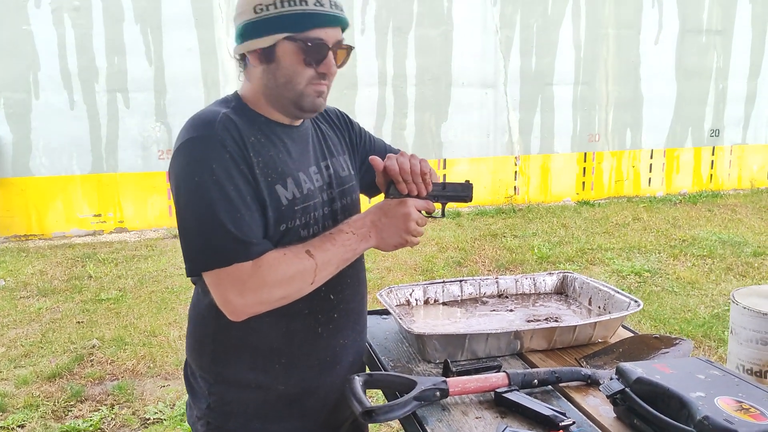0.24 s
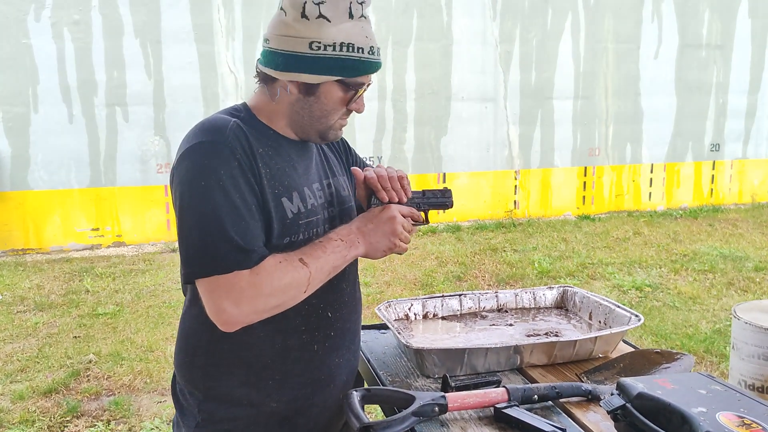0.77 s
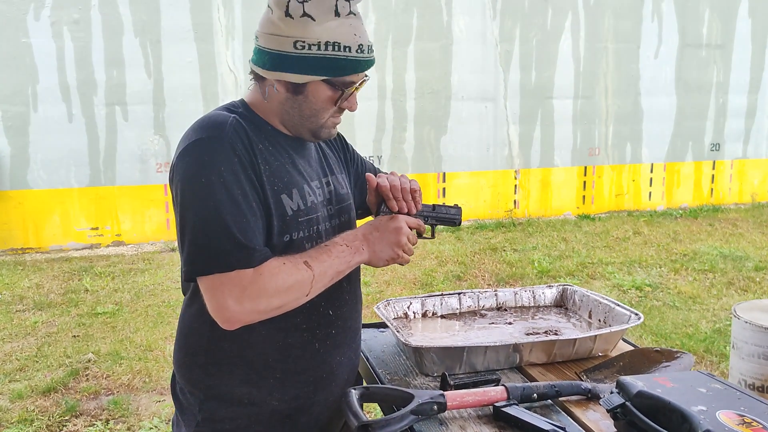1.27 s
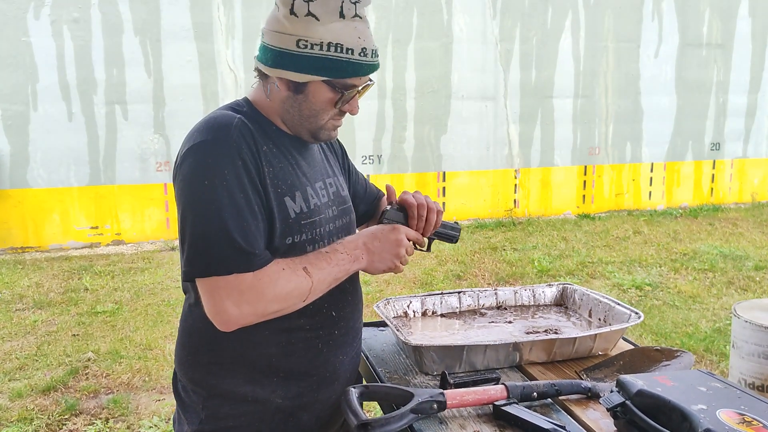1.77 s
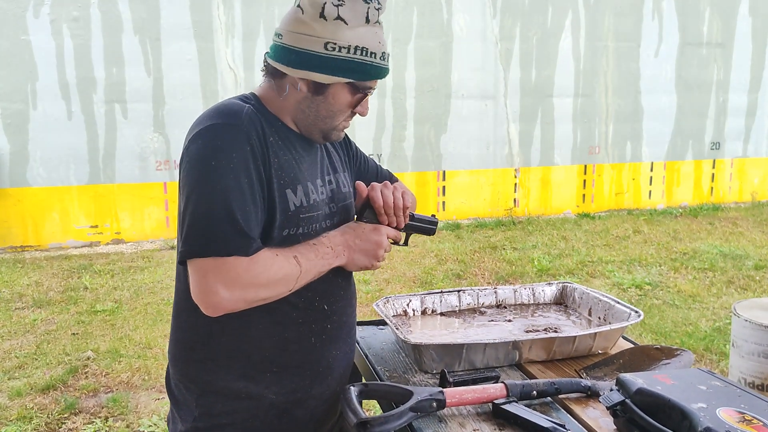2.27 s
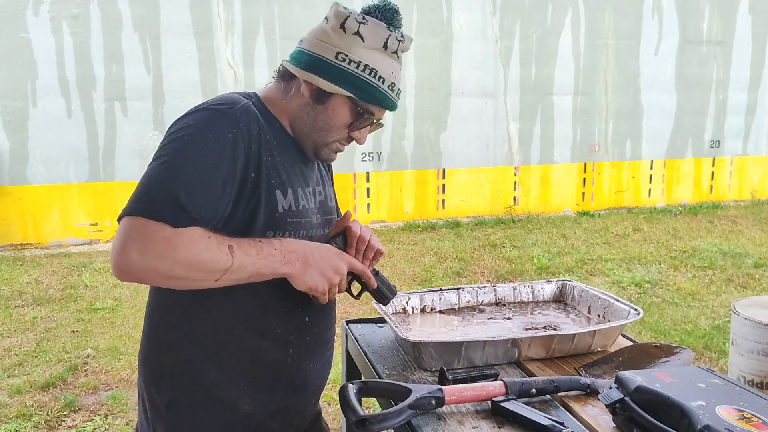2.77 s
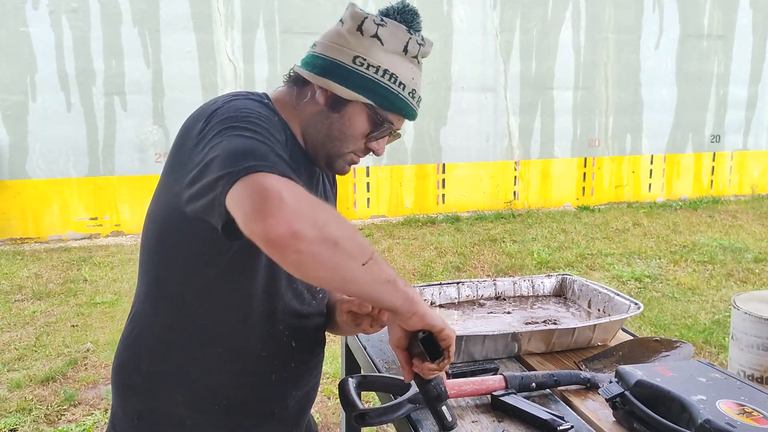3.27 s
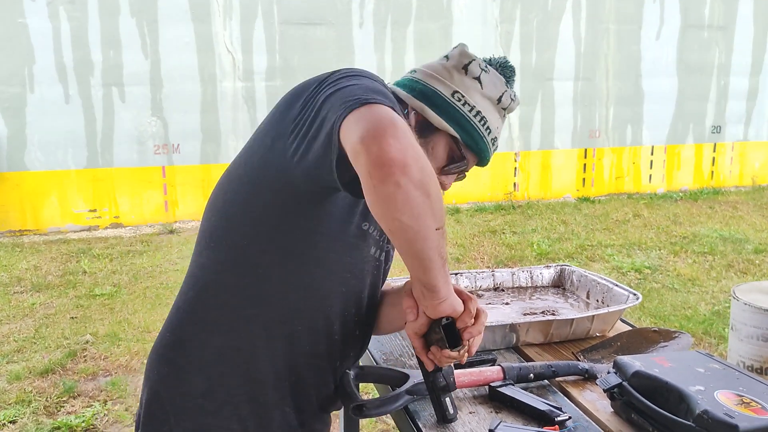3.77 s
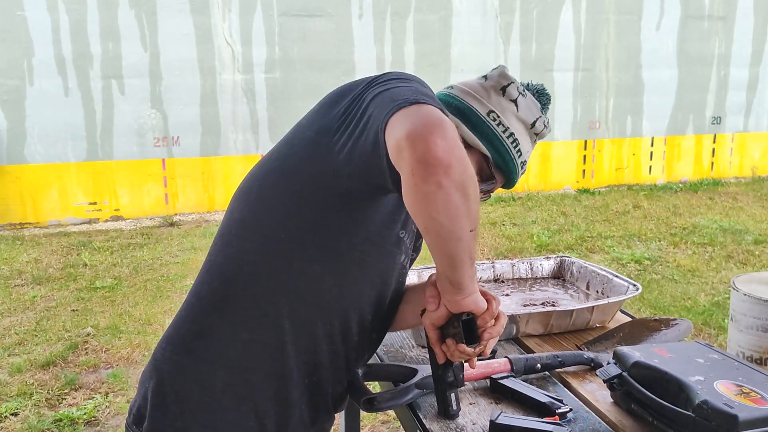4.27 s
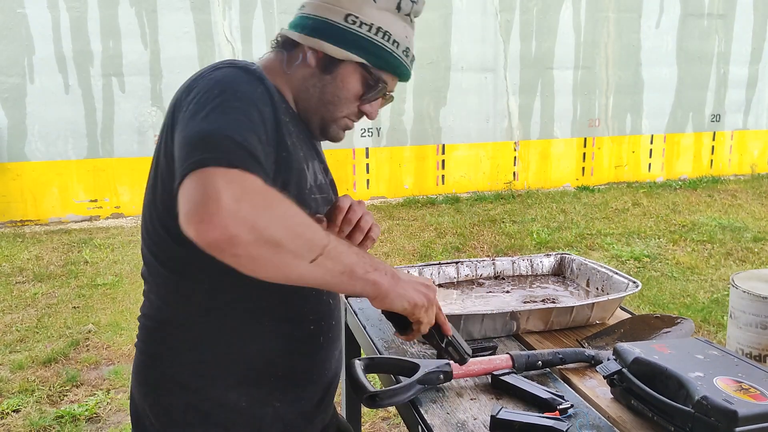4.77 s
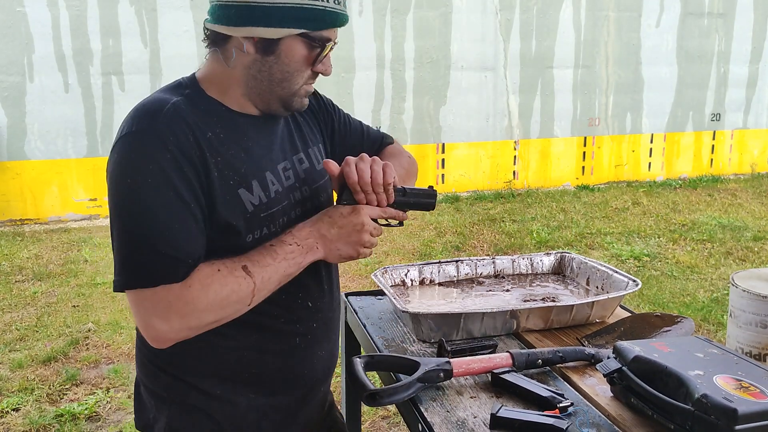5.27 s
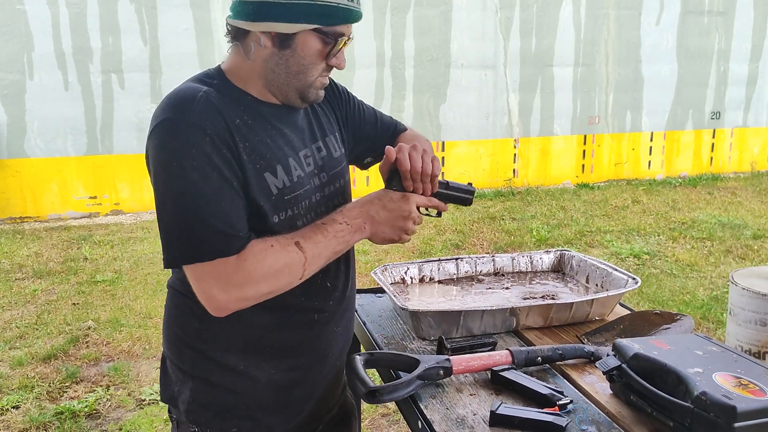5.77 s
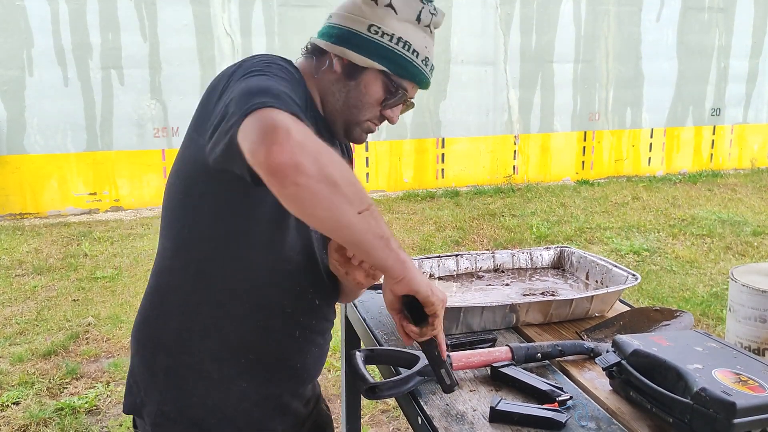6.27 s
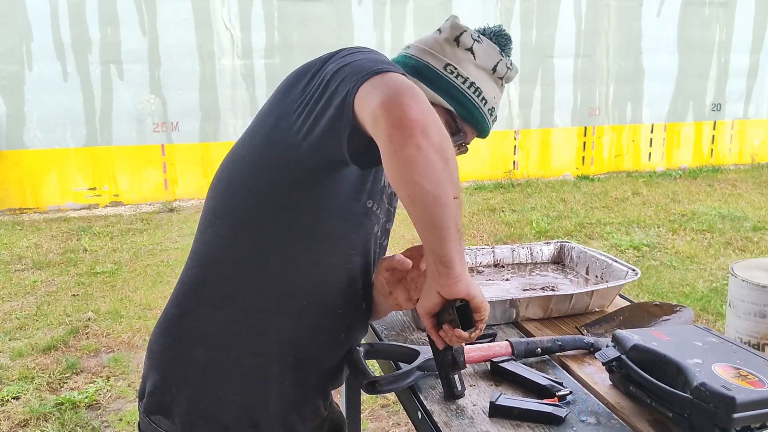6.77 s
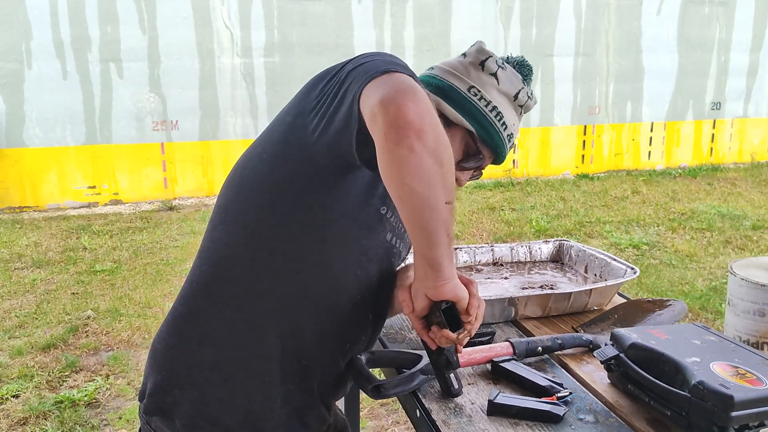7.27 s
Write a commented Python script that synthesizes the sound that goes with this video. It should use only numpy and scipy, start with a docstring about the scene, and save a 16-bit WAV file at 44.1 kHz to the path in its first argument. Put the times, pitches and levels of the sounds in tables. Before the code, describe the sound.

Close stereo sound of steel handling at an open range with distant reflecting walls. Two very loud metal slams come early, among catches and ticks. After a quieter gap, soft wooden knocks lead to a heavy shove with board resonance and rattle. A clack and scrape mark the lift, then light handling, another knock, and a final short, hard shove. Thin high chirps, low wind puffs and a dying wash lie behind.

```python
"""A jammed pistol slide is forced by hand at an outdoor range, in light wind and a fading distant wash.
Held up, it slams twice: noise cracks with ringing steel modes; a bird chirps in short runs of arched tones.
The muzzle is then set on a wooden table and shoved down: filtered thuds, board modes and a rattling tail.
It is lifted, set down again and shoved once more at the end, with far less boom. Clicks, scrapes of tiny
slips and faint handling ticks run between; the wind is low noise with early puffs on the microphone."""
import sys
import numpy as np
from scipy import signal
from scipy.fft import rfft, irfft, next_fast_len
from scipy.io import wavfile
from scipy.ndimage import uniform_filter1d

SR = 44100
rng = np.random.default_rng(int(sys.argv[2]) if len(sys.argv) > 2 else 0)


def unload_wav(signal):
    """Save mono or channel-first audio to the path in sys.argv[1] as 16-bit WAV at rate SR, clipped to [-1, 1]."""
    wavfile.write(
        sys.argv[1],
        SR,
        np.round(np.clip(np.atleast_2d(signal).T, -1, 1) * 32767).astype(np.int16),
    )


N = 332293

# body weight drives the slide against the table:
# start_s, level_db, boards_boom_db, hardness_db_per_octave, left_minus_right_db
SHOVES = [(4.0898, -16.5, 0.5, 0.8, -4), (7.49, -16.5, -14, 1.5, 2.5)]
# ring of slide and barrel: mode_hz, level_db, t60_s
STEEL_MODES = [(970.4, 1.5, 0.1), (1390, -6, 0.074), (1523, -5, 0.14), (1963, -6.5, 0.12), (2535, 0, 0.09),
               (2862, 3.5, 0.05), (3010, 3, 0.081), (3437, 0.5, 0.08), (3660, -4.5, 0.09),
               (4410, -3.5, 0.12), (4700, -3.5, 0.08), (5740, -2, 0.13), (6230, -2, 0.031),
               (7300, -5, 0.16), (10260, -9, 0.073), (11300, -10, 0.12), (11900, -7.5, 0.056)]
# spectrum of a steel contact: freq_hz, density_db_per_hz
CRACK_SPECTRUM = [(100, -39), (500, -26.5), (780, -12), (960, -6.5), (1150, -10), (1500, -6.5), (2000, -3),
                  (2900, -2.5), (4000, -2.5), (5600, -2.5), (8000, -8), (10000, -11.5), (12500, -6),
                  (16000, -13)]
LEFT_LEAD_SAMPLES = 21  # the held-up gun is nearer the left port


def slams():
    """The barrel is picked up with a short tick, then the slide stops against the frame."""
    # start_s, level_db, tilt_db_per_octave, first_touch_lead_s, first_touch_relative_db
    slam_rows = [(0.586, -8, 0.63, .0038, -8), (1.4912, -6.5, 1.5, 0.004, -7)]
    out = np.zeros((2, N))
    for start_s, level_db, tilt_db_oct, lead_s, touch_db in slam_rows:
        touch = contact(1, tilt_db_oct - .5, crack_s=.002, near_db=-16.0, near_t60_s=.05,
                        far_db=-34.0, steel_db=-10.5)
        left_right_db = np.array([[6], [-1]])
        add(out, start_s - lead_s, amp(level_db + touch_db + left_right_db) * touch)
        stop = contact(0.93, tilt_db_oct, crack_s=0.003, near_db=-15.5, near_t60_s=0.15,
                       far_db=-27.0, steel_db=-8.5)
        stop = amp(level_db + 4) * stop
        add(out, start_s, stop)
        add(out, start_s + 0.012, amp(-14.5) * stop[::-1])  # echo off the ground, sides swapped
    return out


def clicks():
    """Steel parts catch and let go, and each shove ends with the slide on its stop."""
    # start_s, level_db, brightness_db_per_octave
    click_rows = [(0.3586, -28, -1.9), (0.4654, -25.5, -2), (0.7698, -26.5, 1), (0.7951, -13, -3.5),
                  (0.947, -24, -4.5), (1.1452, -29.5, -4.4), (1.4525, -23, 0), (2.4411, -36, 0),
                  (2.5354, -22, -2), (2.7076, -37, 3.5), (2.8202, -37.5, 15), (3.5578, -35, -3),
                  (3.5893, -26.5, -2.3), (3.646, -32, -0.5), (3.7207, -38.5, -4.5), (4.2367, -21.5, -9.5),
                  (4.464, -35, 2), (4.5448, -34.5, 2), (4.6108, -26.5, 1), (4.762, -24.5, -4.5),
                  (4.7836, -15, -1), (5.3737, -36.5, 4), (5.3996, -29, -5), (5.948, -37, -3.5),
                  (6.0853, -40.5, -7.5), (6.4762, -36, 2.8), (6.5001, -33.5, 0.2), (6.6039, -29.5, -3),
                  (7.222, -39, -1), (7.394, -45.5, -14)]
    pan_pressed_db, pan_held_db = 0.5, 2.5  # left minus right
    stop_delay_s, stop_db, stop_tilt_db_oct = 0.0053, 12, -0.9
    out = np.zeros((2, N))
    for start_s, level_db, tilt_db_oct in click_rows:
        pan_db = by_pose(start_s, pan_pressed_db, pan_held_db)
        add(out, start_s, click(start_s, level_db, tilt_db_oct, pan_db))
    for start_s, level_db, _, _, pan_db in SHOVES:
        stop = click(start_s, level_db + stop_db, stop_tilt_db_oct, pan_db)
        add(out, start_s + stop_delay_s, stop)
    return out


def click(start_s, level_db, tilt_db_oct, pan_db):
    """One steel contact; with the muzzle down, the barrel clanks louder and higher."""
    # barrel pressed on wood, before pitch scaling: mode_hz, level_db, t60_s
    barrel_modes = [(1830, 0, 0.06), (2134, -2, 0.13), (2520, -10.5, 0.059)]
    t = np.arange(SR // 2) / SR
    raised = by_pose(start_s, 0, 0.98)
    tick = contact(raised, tilt_db_oct, crack_s=0.0025, near_db=-16.5, near_t60_s=.13,
                   far_db=-26, steel_db=-10.5)
    tick = amp(2.3 * raised - 6.5) * tick
    pitch = by_pose(start_s, 1.04, 0.92)  # pressure raises the ring
    barrel = [(hz * pitch, mode_db, t60_s) for hz, mode_db, t60_s in barrel_modes]
    clank_db = by_pose(start_s, -14, -19.5) - 0.5 * tilt_db_oct  # dull clicks stir the barrel more
    clank = amp(clank_db) * ring(barrel, t, 0, 2000, spread_rad=0.74, scatter_db=3)
    clank = clank * (1 - np.exp(-t / .001))
    return amp(level_db + pan_db * np.array([[.5], [-.5]])) * (tick + clank)


def contact(raised, tilt_db_oct, crack_s, near_db, near_t60_s, far_db, steel_db):
    """A hard crack, a ring of steel, and scatter from near things and far walls."""
    t = np.arange(SR // 2) / SR
    lead = round(LEFT_LEAD_SAMPLES * raised)  # the table is straight ahead
    crack = colour(pair(len(t), 0.13, lead), CRACK_SPECTRUM, tilt_db_oct) * np.exp(-t / crack_s)
    near = colour(pair(len(t), 0.95, lead), CRACK_SPECTRUM, tilt_db_oct - .7)
    near = near * amp(near_db - 60 * t / near_t60_s)
    far = colour(pair(len(t), 0.069), CRACK_SPECTRUM, tilt_db_oct - 3.0) * amp(far_db - 60 * t / 0.38)
    steel = ring(STEEL_MODES, t, tilt_db_oct, 4000, spread_rad=0.82, scatter_db=3.0)
    steel = amp(steel_db - 11 * (1 - raised)) * steel  # pressure damps it
    return (crack + near + far + steel) * (1 - np.exp(-t / 0.0013))


def knocks():
    """Light touches knock once; a shove heaves the table, which knocks again as it rebounds."""
    # muzzle set down, shifted or lifted: start_s, level_db, boards_boom_db, hardness_db_per_octave
    knock_rows = [(3.37, -38.5, 5, -5), (3.588, -34, -1, -5.5), (4.606, -36, 1.5, -5),
                  (4.775, -28, -1.5, -2.5), (4.843, -55, 9, -12), (6.475, -29, 5, -3.5),
                  (7.392, -44.5, -7, -1)]
    rebound_s, rebound_db, rebound_boom_db = 0.0275, 0, -1.5
    out = np.zeros((2, N))
    for start_s, level_db, boom_db, hard_db_oct in knock_rows:
        add(out, start_s, knock(level_db, boom_db, hard_db_oct, sway_db=-3))
    for start_s, level_db, boom_db, hard_db_oct, _ in SHOVES:
        add(out, start_s, knock(level_db, boom_db, hard_db_oct, sway_db=1.5))
        rebound = knock(level_db + rebound_db, boom_db + rebound_boom_db, hard_db_oct, sway_db=-12)
        add(out, start_s + rebound_s, rebound)
    return out


def knock(level_db, boom_db, hard_db_oct, sway_db):
    """The muzzle drives the table: a short thud, booming boards and one low heave of the frame."""
    # thud: freq_hz, density_db_per_hz
    thud_spectrum = [(25, -24), (55, -11), (110, 1), (180, 0.5), (330, -1), (620, -3.5), (800, -11.5),
                     (980, -11), (1500, -21), (2200, -20.5), (3500, -31.5), (8000, -33.5), (16000, -59)]
    # ring of the table boards: mode_hz, level_db, t60_s
    board_modes = [(122, -5, 0.69), (173.9, 3, 0.43), (202.6, 0.5, 0.28), (287.6, -9.5, 0.41),
                   (333.8, -6.5, 0.35), (406, -21, 0.32), (446, -9.5, 0.057), (584, -24, 0.14),
                   (653, -11.5, 0.29)]
    t = np.arange(SR * 3 // 4) / SR
    rattle_db = -8.5 + 0.14 * (level_db + 24.0)  # a hard blow shakes more of the things on the table
    thud = colour(pair(len(t), 0.92), thud_spectrum, 0.9 * hard_db_oct, 250)
    thud_and_rattle = thud * (amp(-5.0 - 60 * t / 0.12) + amp(rattle_db - 60 * t / 0.5))
    boards = amp(boom_db) * ring(board_modes, t, hard_db_oct, 250, spread_rad=0.32, scatter_db=1.0)
    sway = amp(sway_db - 60 * t / 0.15) * np.sin(2 * np.pi * 63 * t)
    return amp(level_db - 6.0) * (thud_and_rattle + boards + sway) * (1 - np.exp(-t / 0.0036))


def scrapes():
    """Sliding contact: a swarm of tiny slips that swells, lets go, and sets the steel ringing."""
    # steel and skin sliding: peak_s, level_db, swell_s
    scrape_rows = [(.47, -50, 0.023), (.79, -42, 0.058), (1.47, -51, 0.055), (1.67, -43, 0.08),
                   (3.6, -53, 0.054), (4.787, -31, 0.015), (5.33, -59, 0.013), (5.415, -43.5, 0.037),
                   (5.631, -61.5, 0.078), (6.1, -57.5, 0.049), (6.609, -53.5, 0.038), (7.13, -74.5, .17)]
    grind_s, grind_db, grind_swell_s = 0.0078, -10.5, 0.004  # on the way to the stop
    creep_s, creep_db, creep_swell_s = 0.11, -27, 0.043  # the slide creeps on a little
    fade_share = 0.5  # a scrape lets go faster than it swells
    t = np.arange(N) / SR

    grinds = [(s + grind_s, db + grind_db, grind_swell_s) for s, db, *_ in SHOVES]
    creeps = [(s + creep_s, db + creep_db, creep_swell_s) for s, db, *_ in SHOVES]
    peak_s, level_db, swell_s = np.transpose(scrape_rows + grinds + creeps)[:, :, None]
    distance = np.maximum((peak_s - t) / swell_s, (t - peak_s) / (fade_share * swell_s))
    force = amp(level_db) * np.exp(-np.minimum(distance, 20))
    force[-len(SHOVES):] *= t > np.array(SHOVES)[:, :1]  # creeping starts only once the shove has landed

    slip_db = 2.0 * np.minimum(rng.exponential(1, N), 4)
    slips = (rng.random(N) < 600 / SR) * amp(slip_db)  # 600 per second
    slip_envelope = signal.lfilter([1], [1, -np.exp(-1 / (0.0014 * SR))], slips)
    grit = pair(N, .6, LEFT_LEAD_SAMPLES) * unit(0.13 + slip_envelope)

    steel_ring = ring(STEEL_MODES, t[:SR // 8], -1.5, 4000, spread_rad=0.73, scatter_db=2)
    steel = unit(signal.oaconvolve(grit, steel_ring, axes=1)[:, :N])
    rub = colour(grit, CRACK_SPECTRUM, tilt_db_oct=-1.0) + amp(by_pose(t, -20, -8)) * steel
    pressed_chatter = amp(-7.5) * band(grit, 2010, width_hz=640)
    held_chatter = amp(-9) * band(grit, 1610, width_hz=640)
    chatter = by_pose(t, pressed_chatter, held_chatter)  # of the barrel
    shove_force = force[len(scrape_rows):].sum(0)
    squeal = amp(2.5) * shove_force * band(grit, 2230, width_hz=390)  # barrel under load
    return force.sum(0) * (rub + chatter) + squeal


def fidget():
    """The hands shift on the gun all the time: faint scattered ticks."""
    t = np.arange(SR // 30) / SR
    touch_db = 1.2 * np.minimum(rng.exponential(1, N), 3)
    touches = (rng.random(N) < 12 / SR) * amp(touch_db)  # 12 per second
    decay = np.exp(-t / 0.0016) + 0.11 * np.exp(-t / .012)
    force = signal.oaconvolve(touches, decay)[:N]
    return amp(-56.5) * force * colour(pair(N, 0.33, LEFT_LEAD_SAMPLES), CRACK_SPECTRUM, tilt_db_oct=3.0)


def bird():
    """Thin arched notes with a buzzy trill and a dropping end, smeared by echoes from the walls."""
    song, chirps = np.zeros((2, N)), notes()
    variations = rng.uniform(0.93, 1.15, (len(chirps), 3))
    for (start_s, level_db, reference_hz), (stretch, speed, droop) in zip(chirps, variations):
        t = np.arange(round(0.043 * stretch * SR)) / SR
        u = t / t[-1]
        drop_hz = 1300 * abs(2 * u - 1) ** 3 + 600 * (droop * u) ** 5  # arch and falling end
        trill_hz = 480 * np.sin(2 * np.pi * speed * 330 * t)
        hz = reference_hz - 420 - drop_hz + trill_hz - 900 * (stretch - 1)  # long notes sit lower
        tone = np.sin(np.pi * u) * np.sin(2 * np.pi * np.cumsum(hz) / SR)
        add(song, start_s, amp(level_db - 2.5) * tone[None])
    t = np.arange(SR // 2) / SR
    echoes = pair(len(t), 0.71) * (np.exp(-t / 0.0038) + amp(-20.5 - 60 * t / .5))
    return signal.fftconvolve(song, echoes / np.linalg.norm(echoes[0]), axes=1)[:, :N]


def notes():
    """Each run starts softly, rises and sinks in pitch and slows down: start_s, level_db, reference_hz."""
    # runs of notes: start_s, first_gap_s, level_db, note_count
    song_rows = [(.845, 0.0605, -43.5, 4), (2.156, 0.056, -44.5, 4), (3.364, 0.058, -45.5, 3),
                 (4.143, 0.049, -43, 3), (4.689, 0.06, -45.5, 3), (6.08, 0.054, -51.5, 3)]
    # first to fourth note, before the bird's offsets: reference_hz
    note_references_hz = [8460, 8690, 8635, 8540]
    slowing = 1.31  # ratio of each gap to the last
    first_note_db = -2
    rows = []
    for start_s, gap_s, level_db, count in song_rows:
        for k, reference_hz in enumerate(note_references_hz[:round(count)]):
            note_s = start_s + gap_s * (slowing ** k - 1) / (slowing - 1)
            rows.append((note_s, level_db + first_note_db * (k == 0), reference_hz))
    return rows


def air():
    """A distant wash that dies away, a fine hiss and a narrow whir; all drift in patches."""
    # distant wash: freq_hz, density_db_per_hz
    wash_spectrum = [(100, -6.5), (220, -6.5), (320, -17), (420, -20), (600, -5.5), (850, -3.5),
                     (1250, -6.5), (1750, -5.5), (2200, -2), (3000, -7.5), (5800, -15.5), (7200, -20.5),
                     (9000, -44), (16000, -55.5)]
    # fine hiss: freq_hz, density_db_per_hz
    hiss_spectrum = [(100, -11.5), (600, 5.5), (1400, -8.5), (2500, -6), (5000, -4.5), (9000, -9.5),
                     (13000, -3.5), (16000, -8.5)]
    # levels over time, before trims: time_s, level_db
    wash_curve = [(0.0, -53), (1.64, -57.5), (1.76, -57), (3.07, -63.5), (4.4, -64.5), (5.79, -72),
                  (7.45, -70)]
    hiss_curve = [(0.0, -84.5), (0.77, -71), (1.2, -83), (1.62, -71.5), (2.8, -78.5), (3.19, -71.5),
                  (4.48, -75), (4.67, -66.5), (4.88, -84.5), (5.52, -73), (5.66, -82), (7.45, -79)]
    whir_curve = [(0.0, -60), (1.62, -60.5), (1.82, -65.5), (4.48, -63.5), (5.89, -85.5), (7.45, -77)]
    wash = amp(1.0) * level(wash_curve) * colour(pair(N, 0.073), wash_spectrum)
    hiss = amp(6.0) * level(hiss_curve) * colour(pair(N, 0.6), hiss_spectrum)
    whir = amp(0.5) * level(whir_curve) * band(pair(N, 0.5), 2030, width_hz=150)
    left_minus_right_db = -2.5
    panned = (wash + hiss + whir) * amp(np.array([[.5], [-.5]]) * left_minus_right_db)
    z = signal.stft(panned, nperseg=512)[2]
    patches = uniform_filter1d(rng.standard_normal(z.shape[1:]), size=24, axis=0)  # over frequency
    patches = unit(uniform_filter1d(patches, size=5, axis=1))  # over time
    return signal.istft(z * amp(1.4 * patches), nperseg=512)[1][:, :N]


def wind():
    """Low, lumpy rumble with short puffs across the ports."""
    # rumble: freq_hz, density_db_per_hz
    wind_spectrum = [(20, -29.5), (40, -15), (65, -1), (95, 1), (140, -10), (220, -17.5), (350, -27),
                     (900, -60)]
    # wind strength before trim: time_s, level_db
    gust_curve = [(0.0, -57), (1.82, -59.5), (2.12, -67.5), (3.98, -66), (4.21, -57), (5.83, -68.5),
                  (7.45, -64.5)]
    # strongest puffs on the microphone, before trim: start_s, level_db
    buffet_rows = [(0.287, -41), (0.744, -39), (1.077, -46.5), (1.296, -45.5), (1.701, -39), (1.869, -47.5),
                   (2.331, -48), (2.402, -40.5), (2.5, -46.5)]
    lumps = unit(uniform_filter1d(rng.standard_normal(N), size=SR // 12))
    out = colour(pair(N, 0.89), wind_spectrum) * level(gust_curve) * amp(3.5 + 1.8 * lumps)
    t = np.arange(SR // 6) / SR
    swell = t / .014 * np.exp(1 - t / 0.022)
    for start_s, level_db in buffet_rows:
        puff = unit(colour(pair(len(t), 0.31), wind_spectrum) * swell)
        add(out, start_s, amp(level_db - 10.0) * puff)
    return out


def by_pose(s, pressed, held):
    """Blends two values by where the gun is at time s: pressed on the table or held up."""
    # gun position: time_s, raised (1 held up, 0 pressed)
    pose_curve = [(3, 1), (3.3, 0), (4.8, 0), (5.2, 1), (6.1, 1), (6.4, 0)]
    return pressed + (held - pressed) * np.interp(s, *np.transpose(pose_curve))


def ring(modes, t, tilt_db_oct, pivot_hz, spread_rad, scatter_db):
    """Dying modes; each blow weights them anew, the grip detunes them, each port hears its own phase."""
    hz, level_db, t60_s = np.transpose(modes)[:, :, None]
    hz = hz * (1 + .007 * rng.standard_normal(hz.shape))
    level_db = level_db + scatter_db * rng.standard_normal(hz.shape) + tilt_db_oct * np.log2(hz / pivot_hz)
    phase = np.pi * np.arange(len(hz))[:, None] + spread_rad * rng.standard_normal((2, len(hz), 1))
    weight = amp(level_db) / np.linalg.norm(amp(level_db))
    return (weight * amp(-60 * t / t60_s) * np.sin(2 * np.pi * hz * t + phase)).sum(1)


def pair(size, alike, lead=0):
    """White noise at two ports, partly shared, the left one leading by some samples."""
    a, b = rng.standard_normal((2, size))
    alike = np.clip(alike, 0, 1)
    return np.array([a, alike * np.roll(a, lead) + np.sqrt(1 - alike ** 2) * b])


def colour(x, points, tilt_db_oct=0, pivot_hz=4000):
    """Shapes x by a tilted spectrum, the tilt held flat from two octaves under the pivot; rms 1."""
    size = next_fast_len(x.shape[-1])
    hz = np.fft.rfftfreq(size, 1 / SR)
    gain = amp(read(points, hz) + tilt_db_oct * np.log2(np.maximum(hz / pivot_hz, 1 / 4)))
    return unit(irfft(rfft(x, size) * gain, size)[..., :x.shape[-1]])


def band(x, hz, width_hz):
    """A resonance, width_hz wide per pass, applied twice for steep skirts; rms 1."""
    b, a = signal.iirpeak(hz, hz / width_hz, fs=SR)
    return unit(signal.lfilter(b, a, signal.lfilter(b, a, x)))


def read(points, hz):
    """Reads a spectrum on a log-frequency axis."""
    f, value = np.transpose(points)
    return np.interp(np.log(hz + 1), np.log(f), value)


def level(curve):
    """Gain at every sample from a curve of time_s, level_db."""
    return amp(np.interp(np.arange(N) / SR, *np.transpose(curve)))


def amp(db):
    """Decibels to gain."""
    return 10 ** (np.asarray(db) / 20)


def unit(x):
    """Scales to rms 1."""
    return x / np.sqrt(np.mean(x ** 2) + 1e-20)


def add(mix, start_s, sound):
    """Lays a sound into the stereo mix at start_s, cut at the end of the mix."""
    part = mix[:, max(round(start_s * SR), 0):][:, :sound.shape[1]]
    part += sound[:, :part.shape[1]]


def scene():
    """The gun and table close by, the outdoors behind."""
    # stereo balance of the gun: freq_hz, left_minus_right_db
    balance_curve = [(100, -3.5), (500, 2), (1100, 1.5), (2200, -10), (4200, 0.5), (8000, 1.5),
                     (12000, -15), (16000, -12)]
    hz = np.fft.rfftfreq(N, 1 / SR)
    side = amp(np.outer([.5, -.5], read(balance_curve, hz)))
    side = side / np.sqrt((side ** 2).mean(0))  # keeps the mean power of the two ports
    gun = irfft(rfft(slams() + clicks() + scrapes() + fidget()) * side, N)
    return gun + knocks() + bird() + air() + wind()


def record(dry):
    """The deepest rumble is cut and peaks are rounded off; then the band limit."""
    thin = signal.sosfilt(signal.butter(3, 42, "high", fs=SR, output="sos"), dry)
    held = thin / (1 + (thin / .95) ** 6) ** (1 / 6)
    lowpass = signal.firwin(255, 16050, window=("kaiser", 9), fs=SR)
    return signal.oaconvolve(held, lowpass[None], "same")


dry = scene()
out = record(dry)
unload_wav(out)
```